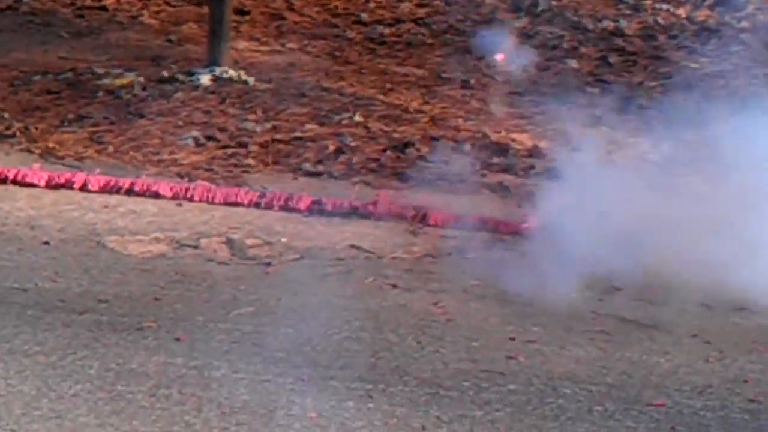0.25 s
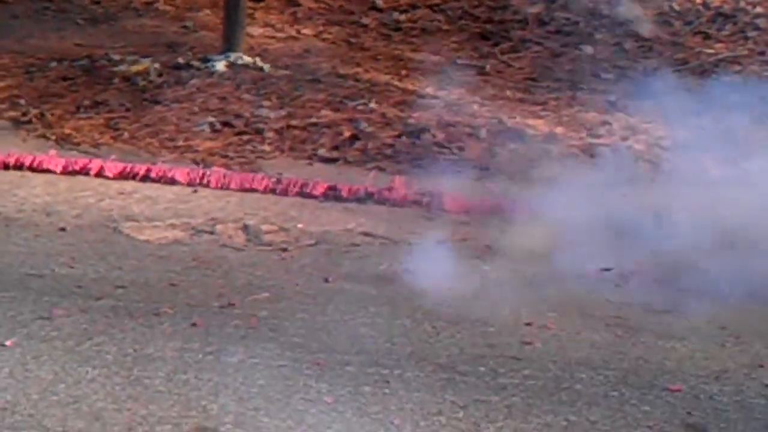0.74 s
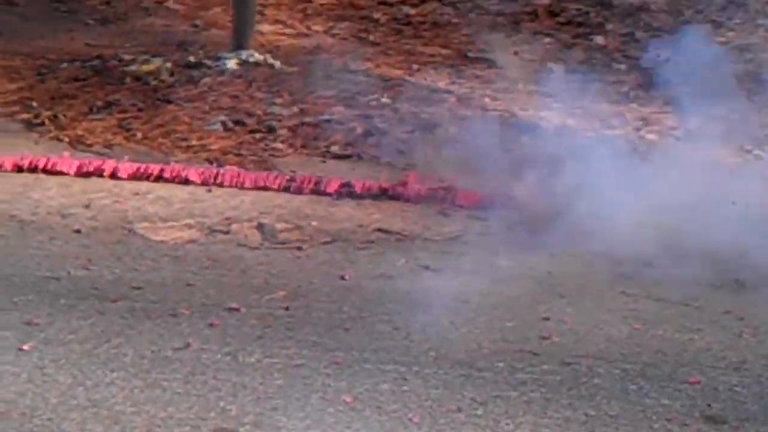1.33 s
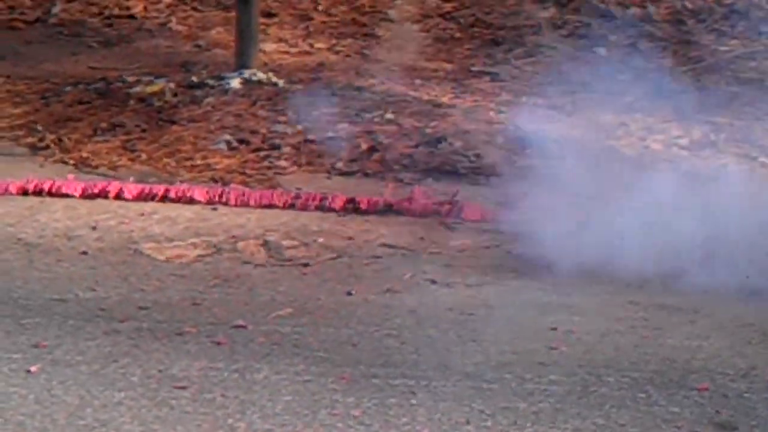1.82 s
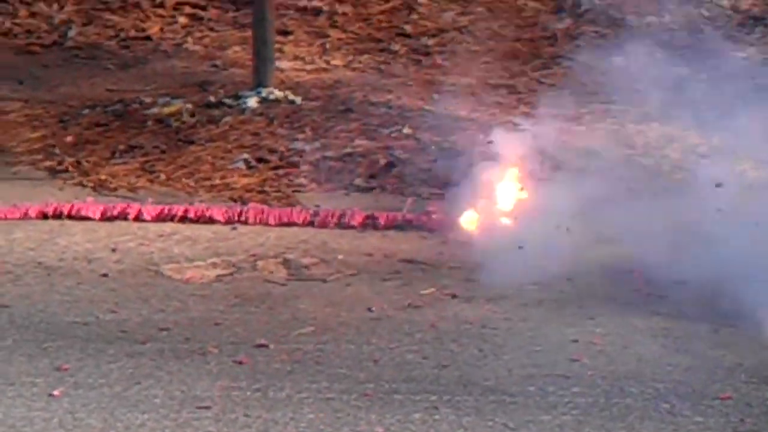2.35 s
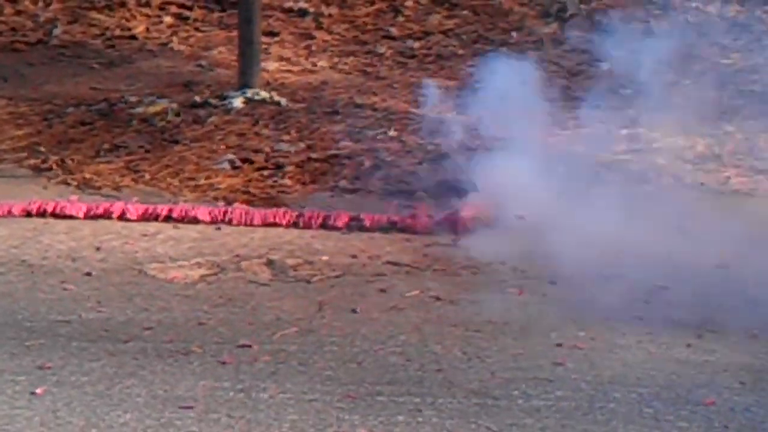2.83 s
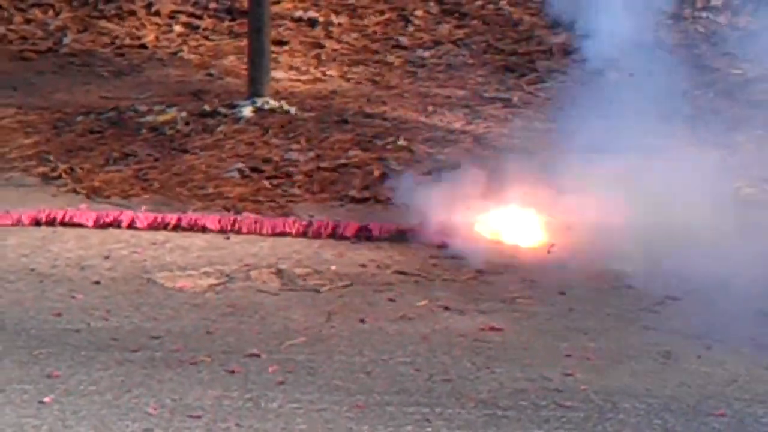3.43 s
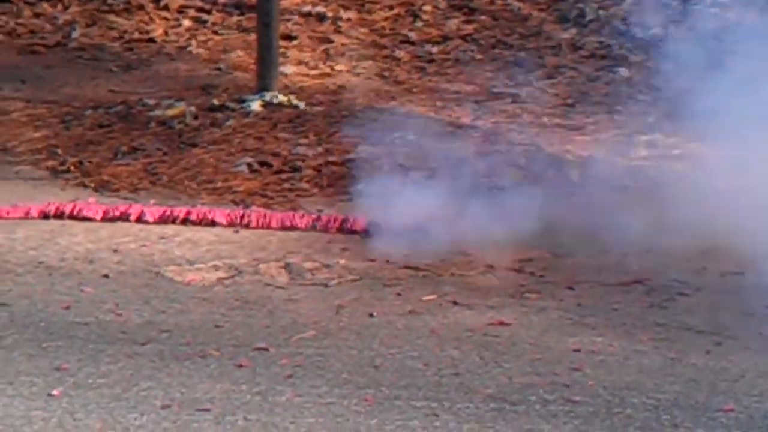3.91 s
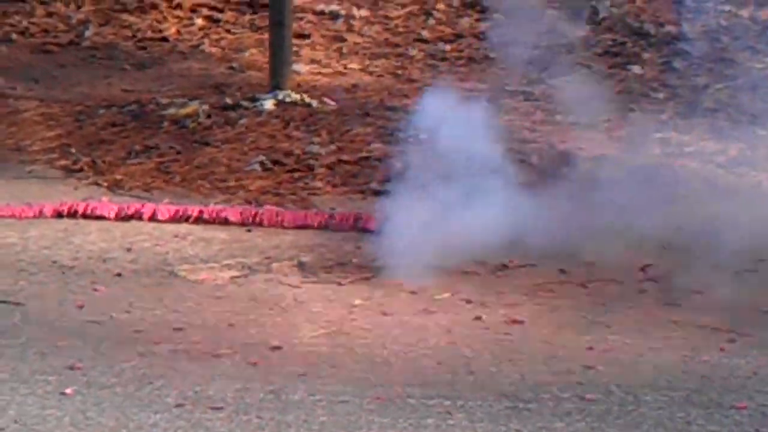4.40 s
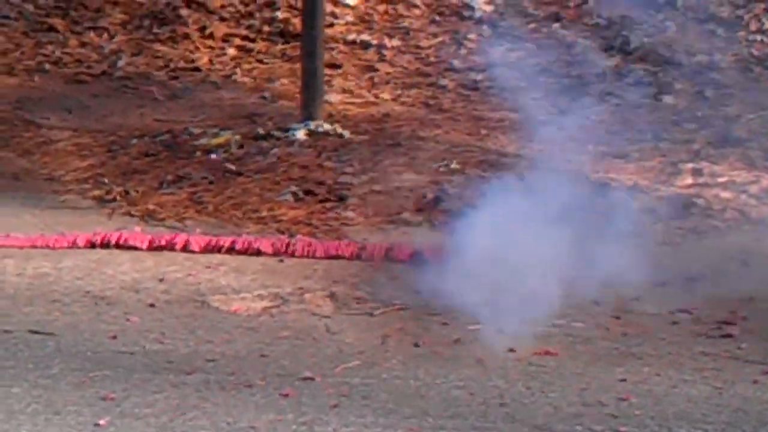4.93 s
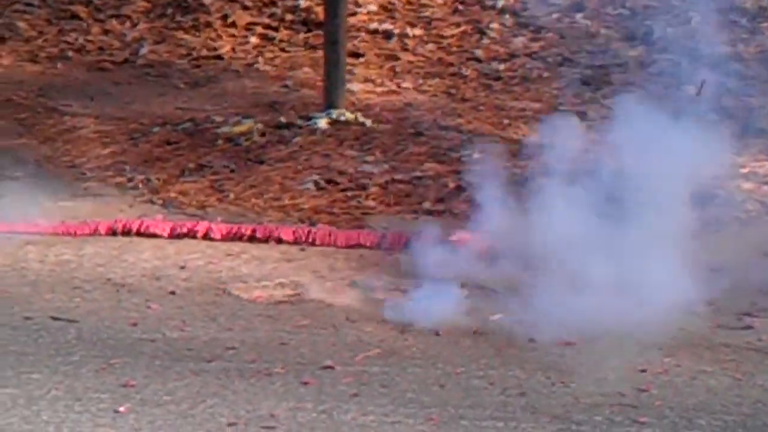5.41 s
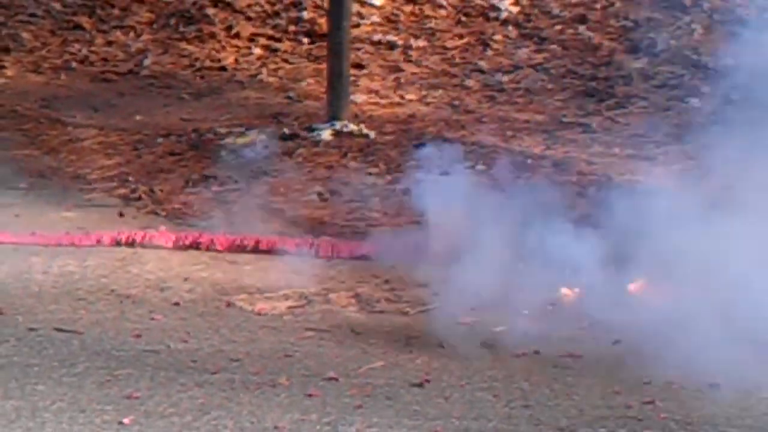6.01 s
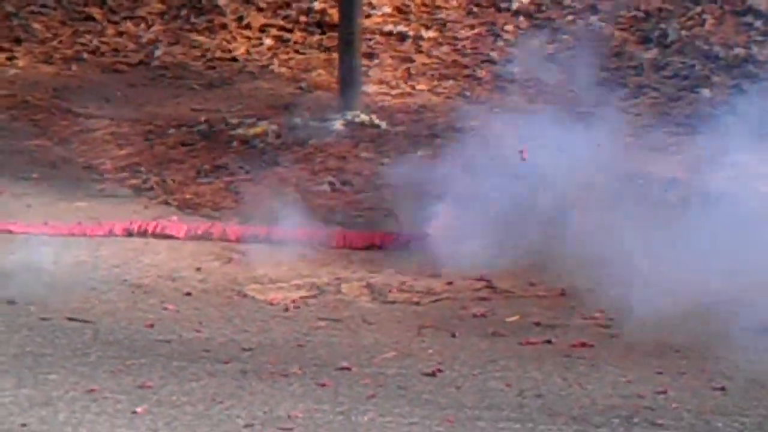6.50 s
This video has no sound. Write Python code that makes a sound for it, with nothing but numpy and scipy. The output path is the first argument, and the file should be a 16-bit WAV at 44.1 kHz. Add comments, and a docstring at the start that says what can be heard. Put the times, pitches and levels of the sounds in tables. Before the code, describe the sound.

Continuous, very dense firecracker explosions outdoors, close to a cheap mono microphone. Snapping bangs and smaller neighbours tumble over one another in uneven bursts, with gaps of only a tenth or two of a second. The sound is loud, flattened and gritty, bright with hiss yet thumping underneath. Level control keeps everything equally loud, pulling up a ragged midrange wash of reflections between bangs. There is no build-up and no final bang; it simply stops mid-crackle.

```python
"""Firecracker string on a road

A long string of firecrackers burns close to a small mono microphone: some seventeen clear bangs a second,
many with a weaker neighbour. Each bang is coloured noise for the bright burst and the duller echo, plus a damped
swing, a dull knock and a slow push of air. The bangs overload the microphone into one rasping crackle, the strongest
pushes choke it for some ms, and gain control lifts the echo in the pauses."""
import sys
import numpy as np
from scipy import signal
from scipy.fft import rfft, irfft
from scipy.io import wavfile
from scipy.ndimage import uniform_filter1d

SR = 44100
rng = np.random.default_rng(int(sys.argv[2]) if len(sys.argv) > 2 else 0)


def wrap_up_sound(samples):
    """Save the sound to the file named by the first command line argument, as 16-bit audio."""
    columns = np.atleast_2d(samples).T
    # keep every value between -1 and 1, then stretch to whole-number steps
    tamed = np.clip(columns, -1, 1)
    steps = np.round(tamed * 32767).astype(np.int16)
    wavfile.write(sys.argv[1], SR, steps)


N = 297675

# The clear bangs; the sign of the push is the side to which it forces the microphone.
# Columns: t/s, burst level/dB, time for the push to fall to half/ms
BANGS = [(.0166, -3, -4), (0.0506, 0, 1), (0.1081, 6, -5.5), (0.1486, 2, -1), (0.176, 6, 5.5),
         (0.3007, 12, -1.5), (0.32, 6, 4.5), (.411, -5, 2.7), (0.4488, -7, -1.5), (0.5018, 0, 4.1),
         (0.5744, -3, -2.5), (0.6178, -8.5, -2), (0.7003, 10, 9.5), (0.719, -12, 3), (0.7476, -3, 1.5),
         (.7874, 1, -1), (1.0382, 4, 13), (1.062, 1, -8), (1.1107, 2, 2.5), (1.1722, 4, 3.5), (1.243, 4, 2),
         (1.299, -1, 4.5), (1.3514, 7, -3.5), (1.45, 9, 2.9), (1.465, -5, -1.5), (1.6136, -7, 5),
         (1.656, 8, -5.5), (1.7058, -3, 12.5), (1.731, 1, -2), (1.765, 6, -11), (1.9537, -7, 4),
         (1.9795, 2, -3.5), (2.036, -5, -2), (2.0527, -7, -2), (2.0801, 3, -1.5), (2.1879, 10, 3),
         (2.217, -2, -1.5), (2.3205, 0, -5), (2.3638, -3, 17.5), (2.386, -10, 10.5), (2.405, -10, 1.5),
         (2.4236, 1, -0.5), (2.5423, 0, 3), (2.5602, -1, 2), (2.5855, -6, -1), (2.6488, 19, 11.5),
         (2.7783, 10, -17.5), (2.843, 17, 6.5), (3.007, 12, -2), (3.094, -1, -2), (3.1353, -3, -1.5),
         (3.2132, 5, -2.8), (3.2762, 2, 0), (3.3484, 4, 1), (3.3828, 8, -4), (3.408, 0, 1.5),
         (3.5102, 3, -1.5), (3.533, 5, 2), (3.569, 5, 1.5), (3.6403, 2, -4.5), (3.672, 8, -1),
         (3.735, 4, -1.4), (3.8147, 15, 2.5), (3.9858, 10, -5), (4.088, 2, 0.5), (4.1195, 12, 2.8),
         (4.166, 8, 2), (4.2013, 9, -3), (4.2468, -6, 1.5), (4.274, 10, 4), (4.316, 6, 0.7),
         (4.388, 9, -10), (4.4785, 10, 1.5), (4.6256, -4, -4.5), (4.7234, -6, 2), (4.7857, 5, 1.5),
         (4.8138, -2, -1), (4.889, 0, -3), (4.9363, -7, -2), (4.9595, -5, 13), (4.9782, -0.5, -5),
         (5.1321, -7, 6), (5.167, 10, 1), (5.3286, 2, -11), (5.3658, 7, 2.3), (5.4053, 0, -5.5),
         (5.456, -1, 7), (5.52, -5, -0.5), (5.5601, -10, 5), (5.5751, -13, 6.5), (5.5925, -8, -3.5),
         (5.671, 1, -9), (5.6851, -6, 0), (5.717, 3, 4), (5.799, -5, -9), (5.836, -6, 6.5), (5.844, -8, -2),
         (5.89, -3, 3), (5.9153, 1, -4), (6.0687, -5, 9.5), (6.1216, -12, 2.5), (6.147, 10, 2),
         (6.194, 6, -10), (6.221, 5, 2.7), (6.2977, -2, 2), (6.3503, -10, -3.5), (6.369, -4, 6),
         (6.3874, 3, 2.5), (6.4148, 3, 6), (6.435, 1, -5.5), (6.5378, -8, 2), (6.5631, 7, -0.7),
         (6.6524, 0, -4)]
# Colour of the knock at the start of a bang. Columns: f/Hz, level/dB
KNOCK_COLOUR = [(100, -15), (280, 3.5), (480, -1.5), (800, 6), (1100, -15.5), (2000, -22), (16000, -58)]
# Colour of the bright burst. Columns: f/Hz, level per Hz/dB
BURST_COLOUR = [(40, -28), (150, -6), (400, -7.5), (800, -1), (1100, -3), (1500, -3.5), (2800, -6.5),
                (4500, -5.5), (7000, -4.5), (10000, -7), (16000, -7)]
# Ring-out of the burst, band by band. Columns: f/Hz, t60/s
BURST_T60 = [(100, 0.1), (1500, 0.44), (6500, 0.3), (10000, 0.23), (16000, 0.13)]
# Colour of the echo from the surroundings. Columns: f/Hz, level per Hz/dB
ECHO_COLOUR = [(40, -38), (180, -34), (275, -5.5), (340, -5.5), (500, -1), (780, 1), (1050, 1.5),
               (1450, 3.5), (2500, 1.5), (4200, -9.5), (7000, -18), (10000, -19), (16000, -26)]
# Ring-out of the echo, band by band. Columns: f/Hz, t60/s
ECHO_T60 = [(100, 0.81), (1500, 0.79), (4000, 0.65), (8000, 1), (16000, 0.6)]
# Resonance of the microphone port. Columns: f/Hz, width/Hz, level/dB
PORT = (7080, 1960, 9.26)
# Tone of the recorder after the overload. Columns: f/Hz, level/dB
TONE = [(30, 8), (100, 3), (300, 1.5), (1000, -0.5), (3000, 0), (7000, -1.5), (11000, -4.5), (16000, -5)]
# Wait before a weaker neighbour goes off. Columns: earliest t/s, latest t/s
NEIGHBOUR_DELAY = (0.013, .04)

NEIGHBOUR_SHARE = 0.6  # chance that a clear bang sets off a neighbour
NEIGHBOUR_DB, NEIGHBOUR_SPREAD_DB = -8, 4
NEIGHBOUR_PUSH_SPREAD_MS = 0.44
FULL_KNOCK_MS = 1.1  # front and knock are near full size for pushes longer than this
TOP_EDGE_HZ = 15900


def firecrackers():
    """Lists clear bangs and weaker neighbours that follow them at random: times s, levels dB, pushes ms."""
    times = np.array(BANGS)[:, 0]
    chance, wait = rng.random((len(times), 2)).T
    size, push = rng.standard_normal((len(times), 2)).T
    earliest, latest = NEIGHBOUR_DELAY
    neighbour_times = times + earliest + wait * (latest - earliest)
    neighbour_db = NEIGHBOUR_DB + NEIGHBOUR_SPREAD_DB * size
    neighbours = np.c_[neighbour_times, neighbour_db, NEIGHBOUR_PUSH_SPREAD_MS * push]
    return np.r_[BANGS, neighbours[chance < NEIGHBOUR_SHARE]].T


def knock_size(push_ms):
    """The blast grows with the length of the push, then levels off at one."""
    return np.tanh((push_ms / FULL_KNOCK_MS) ** 2)


def fronts(times, push_ms, depth=1.62, swing_hz=620, spread=0.19, t60=0.019):
    """The blast front: a fast-dying swing of pressure and suction that starts against the push."""
    t = np.arange(SR // 50) / SR
    out = np.zeros(N + SR)
    for start, ms, chance in zip(times, push_ms, rng.standard_normal(len(times))):
        hz = swing_hz * np.exp(spread * chance)
        swing = np.sin(2 * np.pi * hz * t) * gain_of(-60 * t / t60)
        first = max(round(start * SR), 0)
        out[first:][:len(t)] -= depth * np.sign(ms) * knock_size(ms) * swing
    return out[:N]


def knocks(times, push_ms, level_db=6, t60=0.02):
    """The blast wave and its bounces off the ground: a short thud of dull noise."""
    swings = evened(coloured(rng.standard_normal(N), KNOCK_COLOUR))
    return gain_of(level_db) * swings * dying(t60, times, knock_size(push_ms))


def pushes(times, push_ms, depth=1.33, growth=0.41, steepness=2.27):
    """The slow pressure wave of each bang; the longer it lasts, the stronger it is."""
    t = np.arange(N) / SR
    out = np.zeros(N)
    for start, ms in zip(times, push_ms):
        first = round(start * SR)
        span = slice(max(first, 0), first + SR // 12)
        age = abs(1000 * (t[span] - start)) / (abs(ms) + 1e-6)  # one at half height
        out[span] += np.sign(ms) * depth * abs(ms) ** growth * 0.5 ** (age ** steepness)
    return out


def bursts(times, strength, level_db=11.5):
    """Each shock front is followed by a dense, bright spray from the road and the litter near by."""
    spray = tail(BURST_COLOUR, BURST_T60, times, strength, earlier=0.61)
    return gain_of(level_db) * spray * lumps(0.0027, depth_db=2.0)


def echoes(times, strength, level_db=-10.0, follows=0.17):
    """The surroundings throw the bangs back in uneven clumps, strong and weak ones almost alike."""
    wash = tail(ECHO_COLOUR, ECHO_T60, times, strength ** follows, earlier=7)
    return gain_of(level_db) * wash * lumps(0.017, depth_db=3.0)


def tail(colour, t60s, times, heights, earlier):
    """Noise stands for countless reflections of every bang; each band dies at its own speed."""
    hz = np.fft.rfftfreq(N, 1 / SR)
    spectrum = rfft(evened(coloured(rng.standard_normal(N), colour)))
    centres, decays = np.transpose(t60s)
    total = np.zeros(N)
    for share, t60 in zip(np.eye(len(centres)), decays):
        crossfade = read(np.c_[centres, share], hz)  # one at its own centre, zero at the others
        band = irfft(spectrum * crossfade, N)
        total += band * dying(t60, times, heights, earlier)
    return total


def dying(t60, times, heights, earlier=0):
    """Amplitude of all bangs, summed as energy and dying at t60; earlier is energy left at the start."""
    energy = np.zeros(N)
    starts = np.clip(np.round(times * SR).astype(int), 0, N - 1)
    np.add.at(energy, starts, heights ** 2)
    energy[0] += earlier
    kept = np.exp(-2 * np.log(1000) / (t60 * SR))
    return np.sqrt(signal.lfilter([1], [1, -kept], energy))


def lumps(seconds, depth_db):
    """A random gain that wanders over the given time, by depth_db rms."""
    return gain_of(depth_db * evened(lagged(rng.standard_normal(N), seconds)))


def port(x):
    """The small cavity in front of the microphone rings in the treble."""
    hz, width, db = PORT
    b, a = signal.iirpeak(hz, hz / width, fs=SR)
    return x + (gain_of(db) - 1) * signal.lfilter(b, a, x)


def overload(x, leak=0.39, stuck_from=0.73, stuck_range=0.036, servo_s=0.0018, reach=0.17):
    """Flattens the peaks; an offset servo of limited reach cancels drift, or all of it when stuck to one side."""
    flat = x / (1 + x ** 8) ** (1 / 8)
    window = np.ones(SR // 250) / (SR // 250)  # 4 ms mean
    lean = abs(signal.lfilter(window, 1, flat))
    stuck = np.clip((lean - stuck_from) / stuck_range, 0, 1)
    drift = lagged(flat, servo_s)
    limited = reach * np.tanh(drift / reach)
    offset = stuck * drift + (1 - stuck) * limited  # a stuck signal is pulled back to zero
    squeezed = np.arcsinh(x)
    fizz = squeezed - uniform_filter1d(squeezed, size=21)  # a little treble gets through even at the limit
    return flat - offset + leak * fizz


def gain_control(x, level_db=-17.5, knee_db=-32, headroom_db=-0.6):
    """Holds the power steady: ducks within a ms or two and recovers more slowly."""
    attack_s, release_s = 0.0015, 0.013
    square = np.r_[x[::-1], x] ** 2  # mirrored run-in, so it has settled at the start
    slow = lagged(square, release_s)
    fast = lagged(square, attack_s) / gain_of(headroom_db) ** 2
    power = np.maximum(slow, fast)[N:]
    return gain_of(level_db) * x / np.sqrt(power + gain_of(knee_db) ** 2)


def gain_of(db):
    """Decibels to an amplitude factor."""
    return 10 ** (np.asarray(db) / 20)


def evened(x):
    """Scales to an rms of one."""
    return x / np.sqrt(np.mean(x ** 2) + 1e-20)


def read(points, hz):
    """Reads a table on a log-frequency axis."""
    f, value = np.transpose(points)
    return np.interp(np.log(hz + 1), np.log(f + 1), value)


def coloured(x, points):
    """Shapes the spectrum by a table of f/Hz, level/dB."""
    gain = gain_of(read(points, np.fft.rfftfreq(N, 1 / SR)))
    return irfft(rfft(x) * gain, N)


def lagged(x, seconds):
    """One-pole smoothing with the given time constant."""
    r = np.exp(-1 / (seconds * SR))
    return signal.lfilter([1 - r], [1, -r], x)


def scene(lead_s=0.0006, front_lead_s=0.0009):
    """Pressure on the microphone, in units of the most that it can follow."""
    times, strength_db, push_ms = firecrackers()
    strength = gain_of(strength_db)
    din = port(bursts(times, strength) + echoes(times, strength))
    din = np.roll(din, -round(lead_s * SR))  # the bright spray comes just ahead of knock and push
    din_size = np.sqrt(abs(uniform_filter1d(din ** 2, size=200)))  # local rms over 200 samples
    blast = fronts(times - front_lead_s, push_ms) + knocks(times, push_ms) + pushes(times, push_ms)
    return np.tile(din + din_size * blast, (2, 1))  # the blast grows with the din around it


def record(dry, low_cut_hz=14):
    """Overload, bass cut, tone, gain control and the band limit, in mono on both channels."""
    x = overload(dry[0])
    x = signal.lfilter(*signal.butter(1, low_cut_hz, "high", fs=SR), x)
    x = gain_control(coloured(x, TONE))
    band_limit = signal.firwin(511, TOP_EDGE_HZ, window=("kaiser", 9), fs=SR)
    x = signal.oaconvolve(x, band_limit, "same")
    return np.tile(x, (2, 1))


dry = scene()
out = record(dry)
wrap_up_sound(out)
```